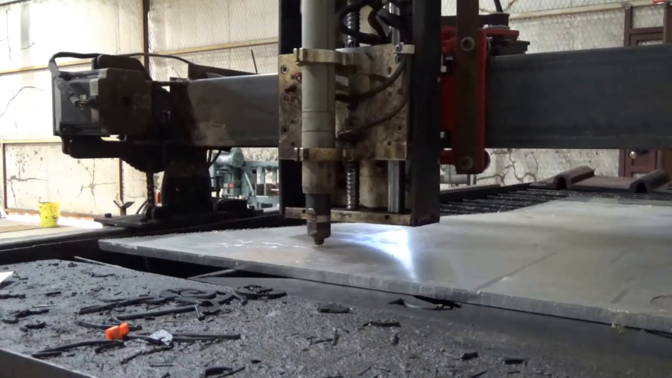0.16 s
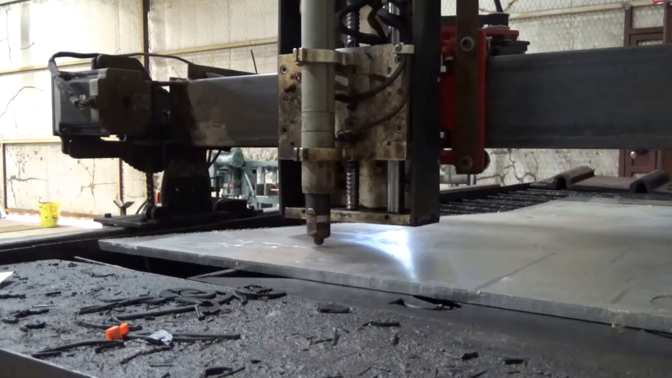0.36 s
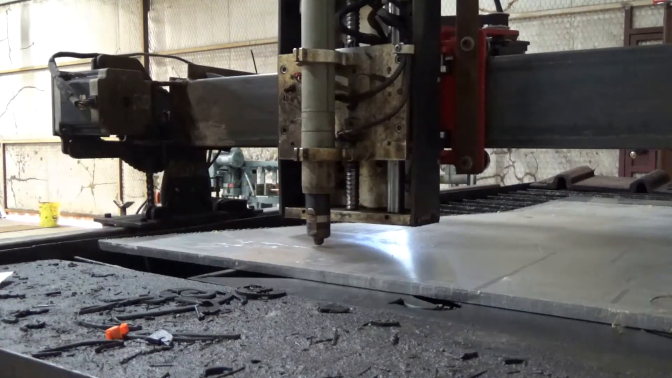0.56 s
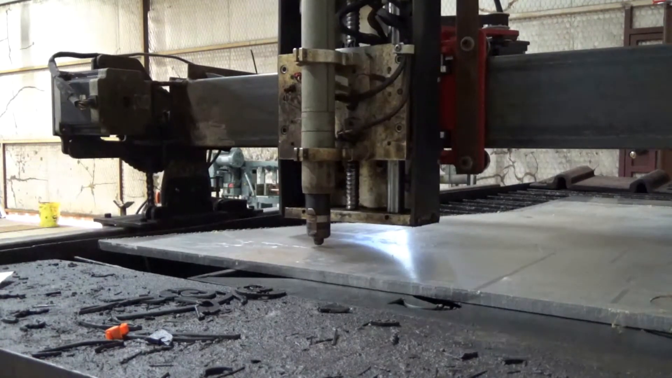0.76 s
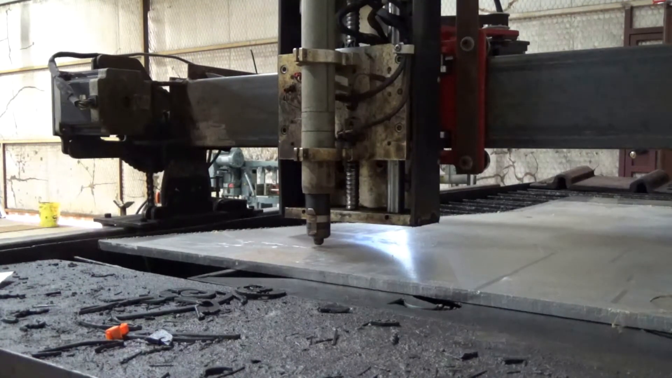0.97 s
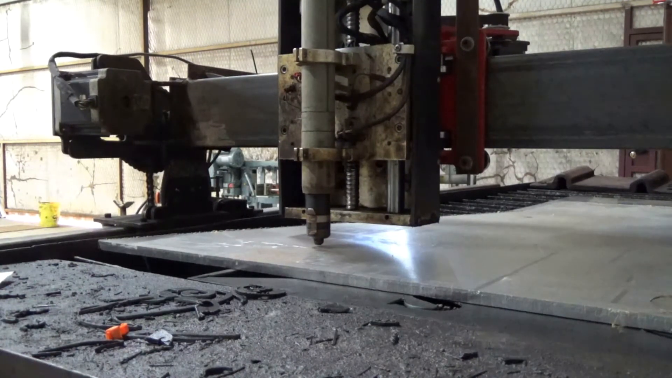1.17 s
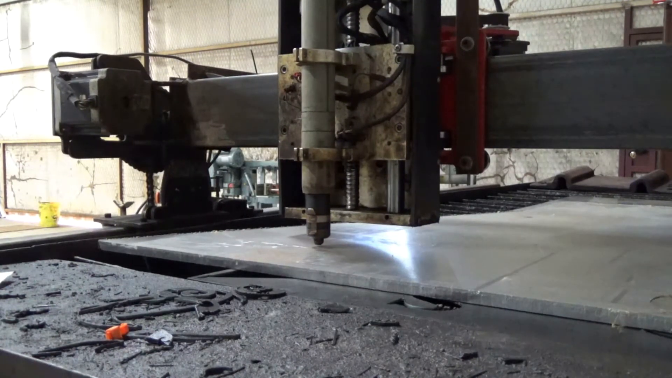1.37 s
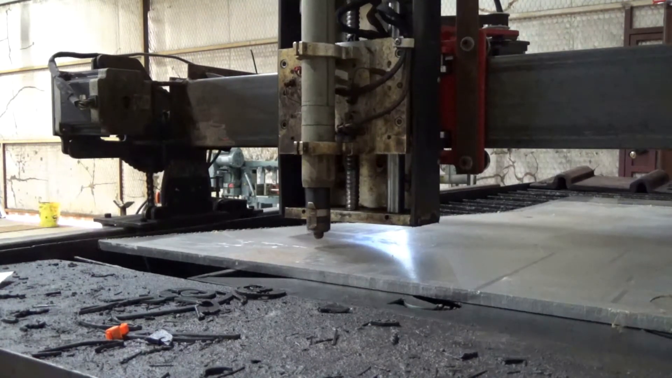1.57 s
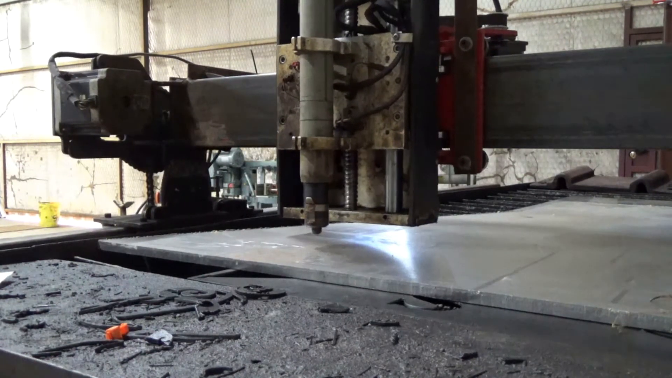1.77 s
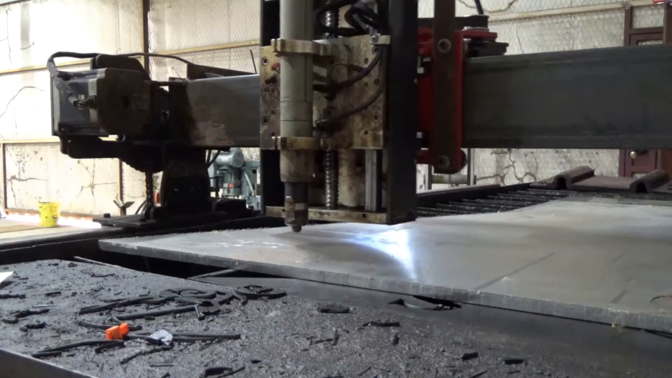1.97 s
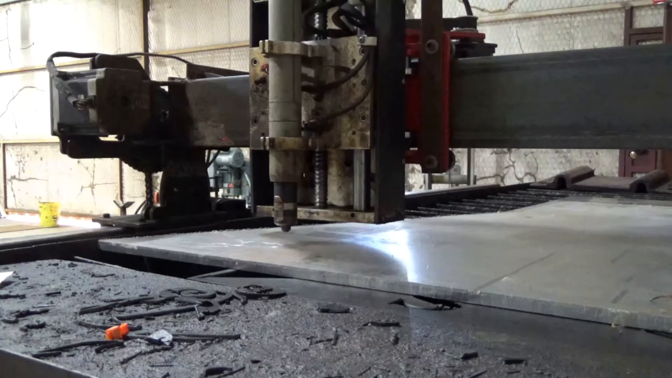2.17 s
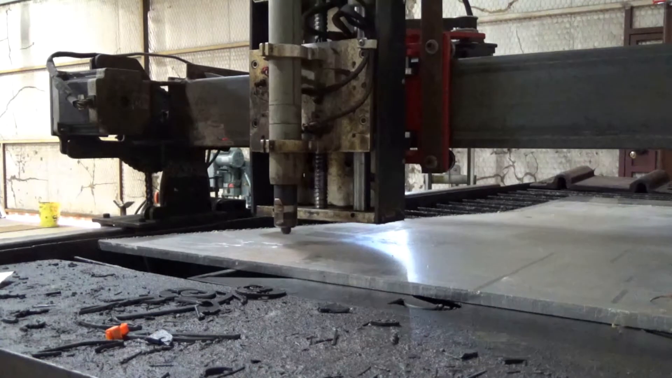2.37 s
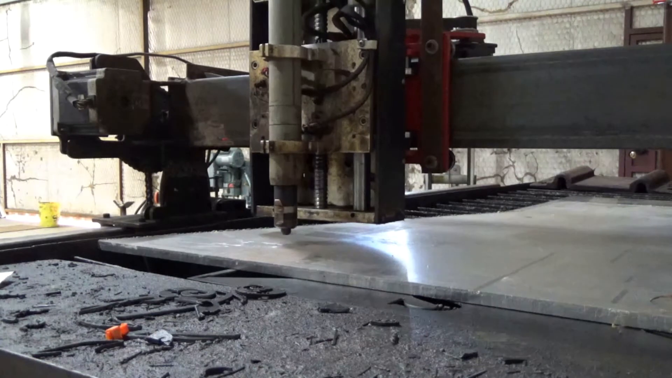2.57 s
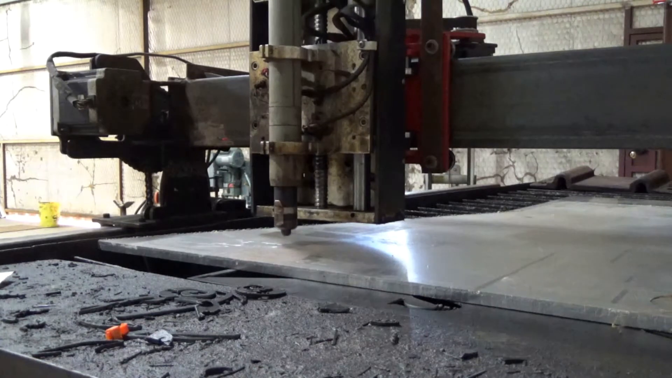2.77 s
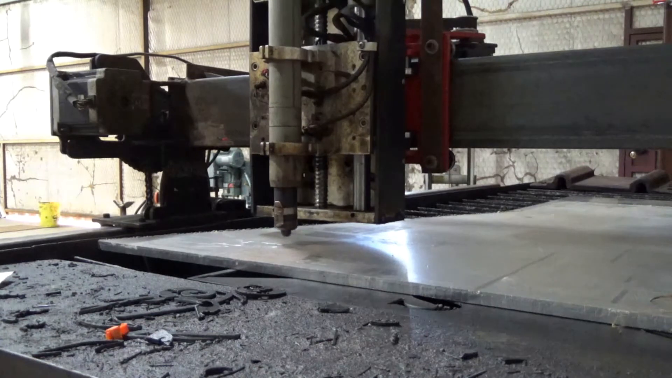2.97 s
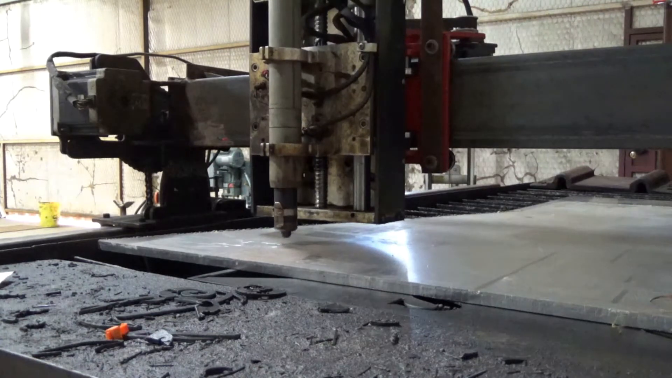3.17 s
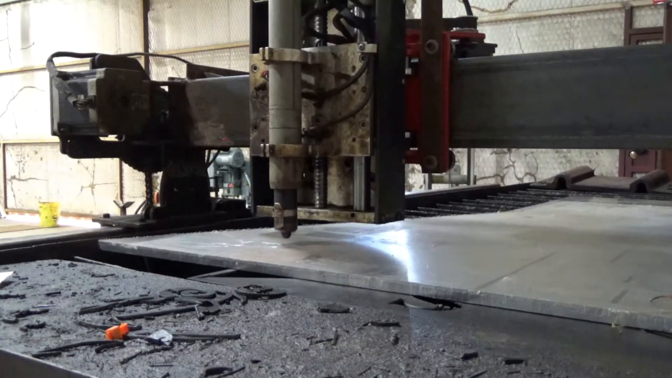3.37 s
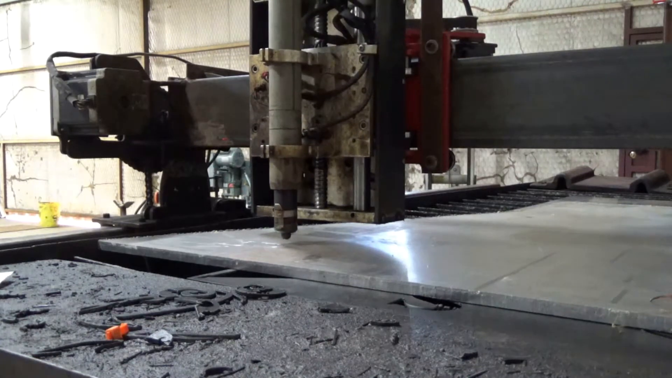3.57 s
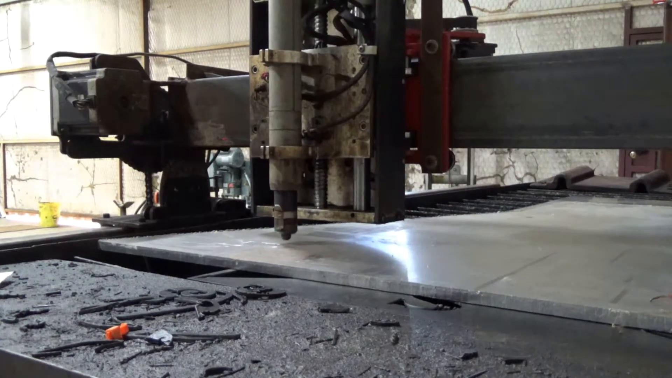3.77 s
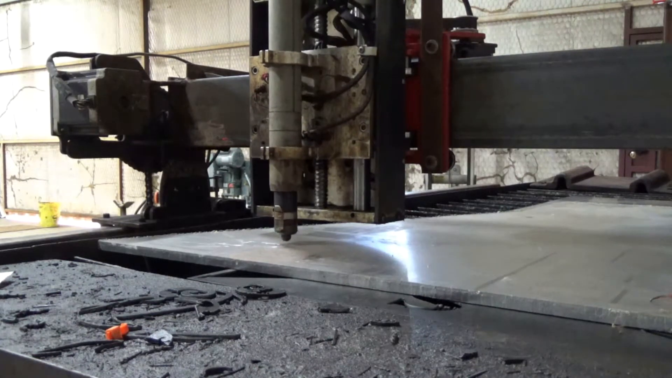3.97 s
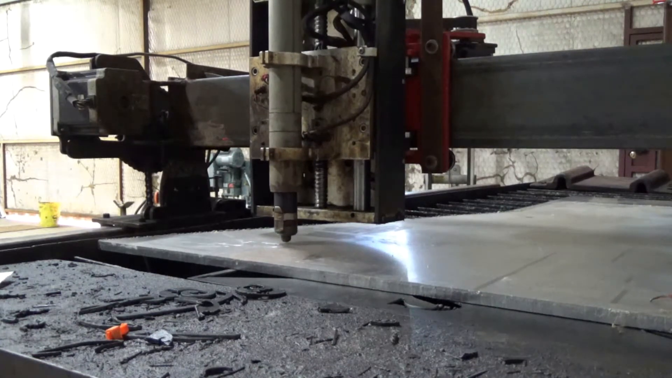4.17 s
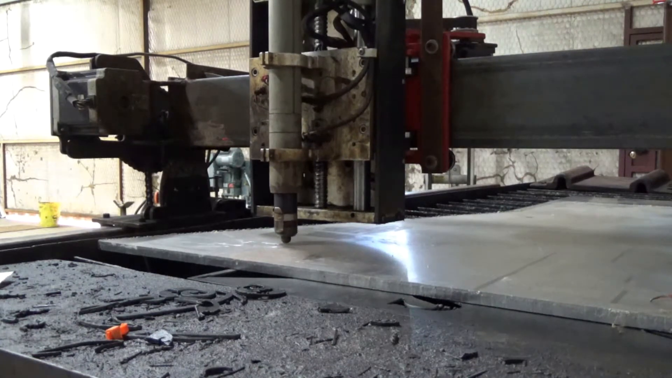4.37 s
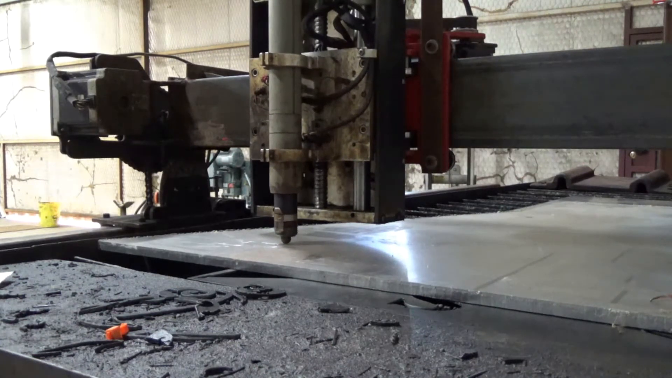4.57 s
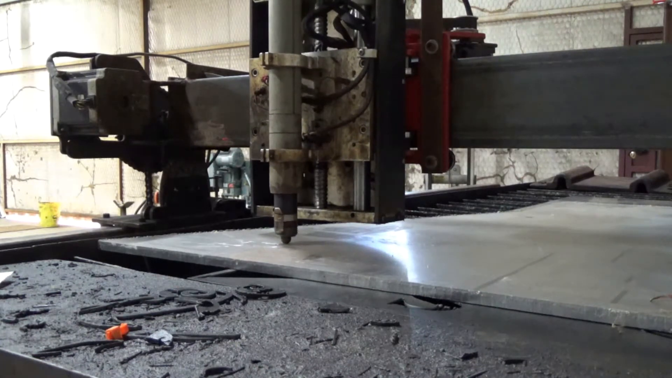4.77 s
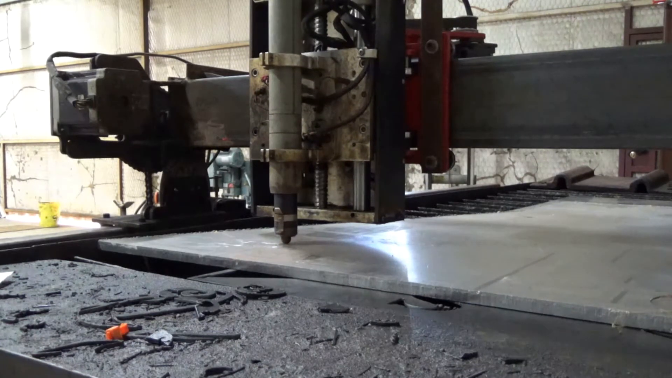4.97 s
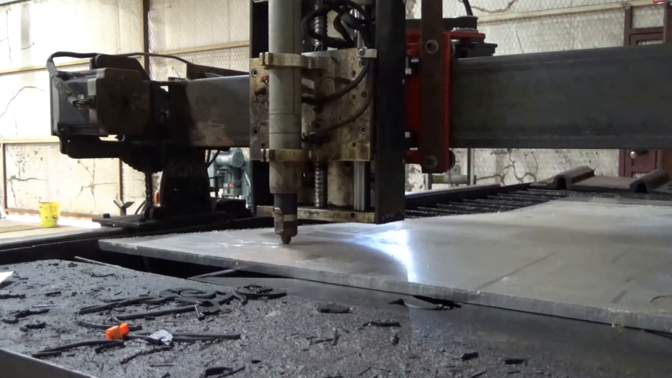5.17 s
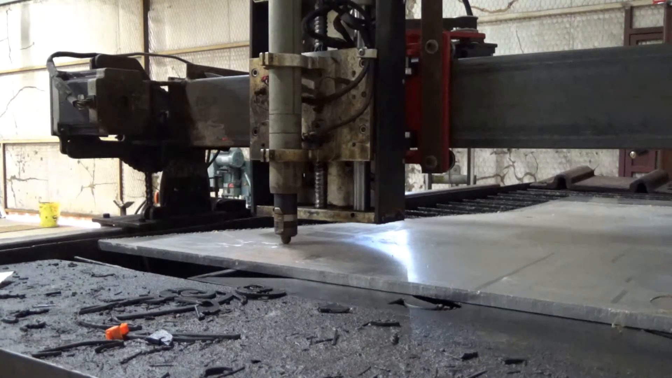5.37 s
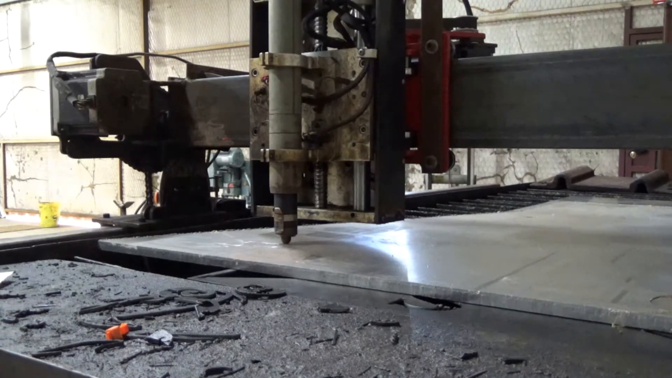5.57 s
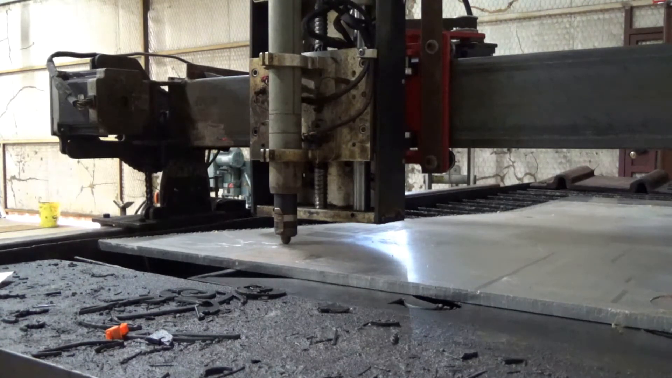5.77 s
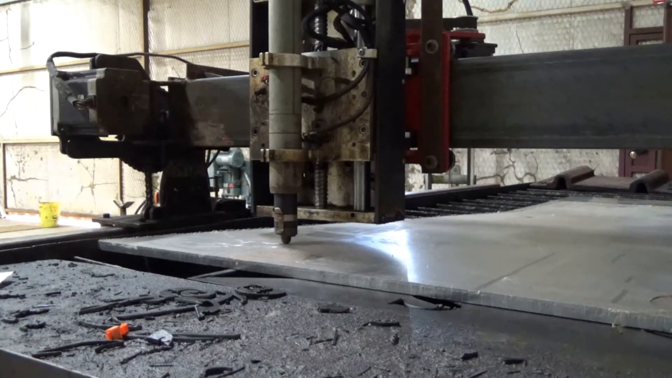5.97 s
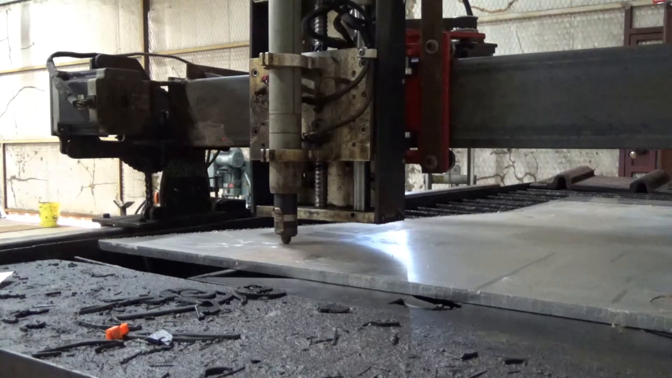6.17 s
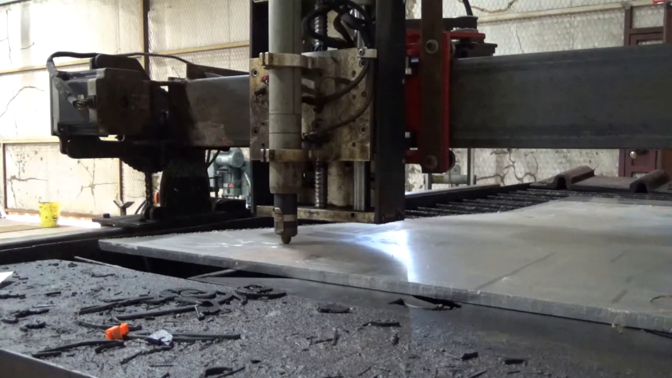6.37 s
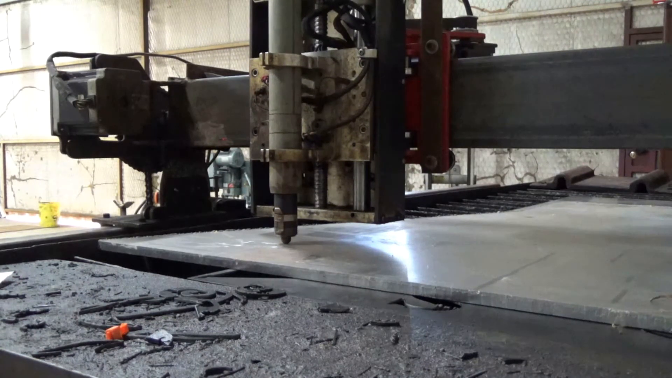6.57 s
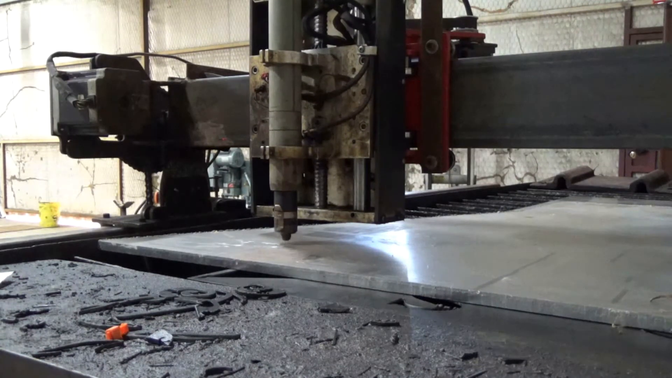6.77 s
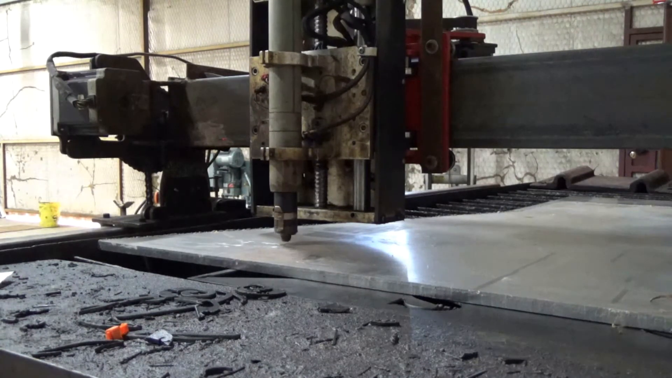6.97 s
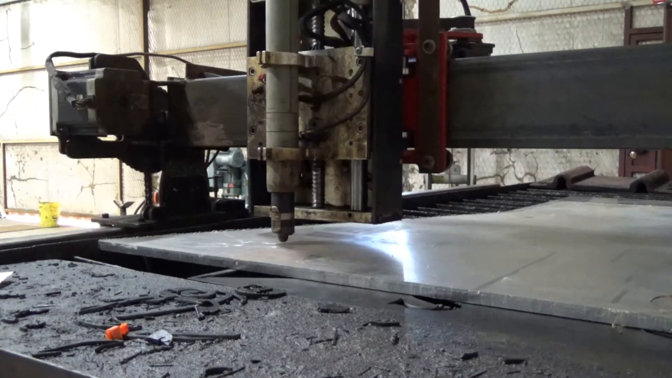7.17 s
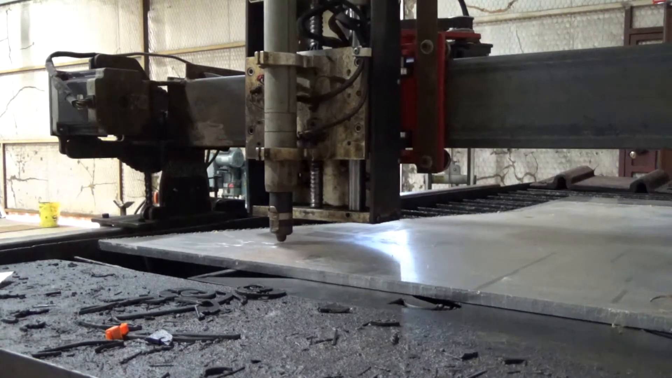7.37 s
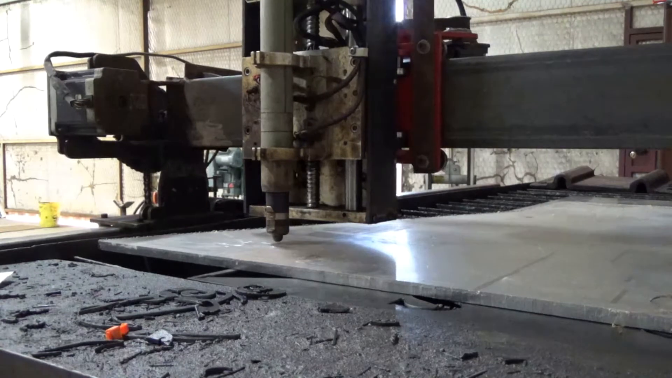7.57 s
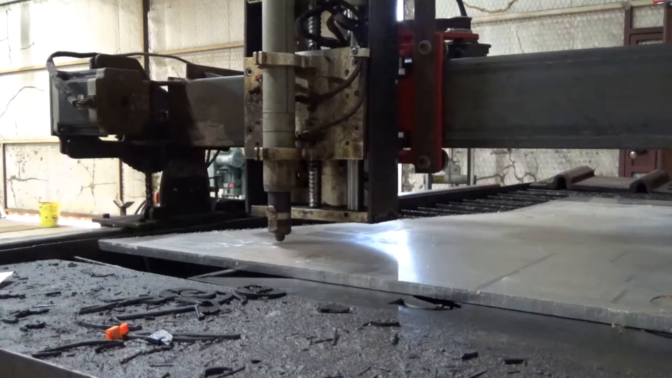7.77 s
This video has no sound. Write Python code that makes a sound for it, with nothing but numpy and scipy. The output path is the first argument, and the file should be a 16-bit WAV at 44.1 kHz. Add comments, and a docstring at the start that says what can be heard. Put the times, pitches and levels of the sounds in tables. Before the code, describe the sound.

Stepper motors whine in quick ramps amid metal knocks and clatter, buzz steadily for several seconds, then growl and rattle once more.

```python
"""A brief whine, then a growl and a clatter: a plasma cutting table moves about in a humming workshop.
Its stepper motors turn in tiny jerks, so their pitch follows their speed. The carriage and gantry (the
bridge it rides on) growl along toothed racks, shake the steel frame and rattle loose fittings. The torch
slide knocks; its lift whines in quick ramps and creeps down for four seconds on a steady buzzing chord.
At the end the lift whines again and the growling and rattling return."""
import sys
import numpy as np
from scipy import signal
from scipy.fft import rfft, irfft, next_fast_len
from scipy.io import wavfile
from scipy.ndimage import uniform_filter1d, map_coordinates

SR = 44100
rng = np.random.default_rng(int(sys.argv[2]) if len(sys.argv) > 2 else 0)


def to_wav(s):
    """Save 16-bit WAV."""
    ch = np.atleast_2d(s).T  # columns
    pcm = np.round(np.clip(ch, -1, 1) * 32767)  # PCM
    wavfile.write(sys.argv[1], SR, pcm.astype(np.int16))


N = 344862

# A motor's speed is given as the frequency of the current in its coils.
TOP_SPEED_HZ, BRAKE_HZ_PER_S = 430.4, 4000
FULL_VOICE_HZ = 122  # below this speed the carriage drive fades away
# Loose fittings strike: (time [s], ring level [dB], clack compared with ring [dB])
CLATTERS = [(0.07, -27.5, 9), (0.214, -7.5, -2.5), (0.231, -21, -1), (1.6177, -24, 7), (1.7269, -21.5, 8),
            (1.99, -17, -2), (2.164, -24, 7), (2.2362, -27, -3), (4.172, -49, 19), (7.0349, -12.5, 1.5),
            (7.0424, -18.5, -4), (7.17, -23.5, 6), (7.1924, -21.5, 3), (7.2448, -15.5, -4),
            (7.2534, -14, 2.5), (7.2723, -15.5, 5.5), (7.427, -26, 9), (7.476, -24, 5), (7.5871, -19, -2),
            (7.67, -12.5, 3), (7.7157, -21, -3), (7.7343, -19.5, 6.5), (7.8114, -23.5, 8.5)]


def amp(db):
    """Turn decibels into a multiplier."""
    return 10 ** (np.asarray(db) / 20)


def unit(x):
    """Scale a signal to an average (rms) strength of 1."""
    return x / np.sqrt(np.mean(x ** 2) + 1e-20)


def along(points, hz):
    """Read between (frequency, value) points on a logarithmic frequency scale."""
    freqs, values = np.transpose(points)
    return np.interp(np.log(hz + 1), np.log(freqs + 1), values)


def curve(points):
    """Join (time, value) points with straight lines."""
    return np.interp(np.arange(N) / SR, *np.transpose(points))


def wobble(rate):
    """A smooth random curve through `rate` new values a second."""
    knots = rng.standard_normal(int(N * rate / SR) + 4)
    coarse = np.arange(0, N + 16, 16)
    return np.interp(np.arange(N), coarse, map_coordinates(knots, [coarse * rate / SR]))


def filtered(x, response):
    """Scale each frequency in x by response(frequency)."""
    size = next_fast_len(N + SR // 2)
    return irfft(rfft(x, size) * response(np.fft.rfftfreq(size, 1 / SR)), size)[..., :N]


def resonances(modes):
    """The response of an object that rings at each (frequency, width, level)."""
    return lambda f: sum((-1) ** k * amp(db) * 1j * f * width / (hz * hz - f * f + 1j * f * width)
                         for k, (hz, width, db) in enumerate(modes))


def noise(response):
    """Filtered stereo noise of strength 1, mostly alike in both ears."""
    # Stereo spread: (frequency [Hz], side compared with middle [dB])
    spread = [(60, -14), (250, -12), (1200, -14.5), (2500, -13), (5000, -9.5)]
    mid, side = filtered(rng.standard_normal((2, N)),
                         lambda f: response(f) * np.array([np.ones_like(f), amp(along(spread, f))]))
    return unit(np.array([mid + side, mid - side]))


def rush(spectrum):
    """Noise shaped by (frequency, level) points."""
    return noise(lambda f: amp(along(spectrum, f)))


def band(hz, width_hz):
    """Noise gathered around one pitch."""
    return noise(lambda f: resonances([(hz, width_hz, 0)])(f) ** 2)


def bursts(times, levels_db, t60):
    """Loudness of hits that start at once and fall 60 dB in t60 seconds."""
    out, t = np.zeros(N + SR), np.arange(SR) / SR
    for start, db in zip(times, levels_db):
        out[round(start * SR):][:len(t)] += amp(db - 60 * t / t60)
    return out[:N]


def swells(rows):
    """Loudness of soft swells, each a (time, half length, level)."""
    t = np.arange(N) / SR
    return sum(amp(db) * np.exp(-np.minimum(50, ((t - peak) / half) ** 2)) for peak, half, db in rows)


def spell(start, stop, fall_db_per_s, attack_s=0.052):
    """Loudness that rises, holds until `stop`, then dies away."""
    t = np.arange(N) / SR
    drop_db = np.minimum(200, fall_db_per_s * np.maximum(0, t - stop))
    return np.clip((t - start) / attack_s, 0, 1) * amp(-drop_db)


def ramp(start, stop, accel, brake, top):
    """Motor speed over one move: speed up, go no faster than `top`, brake to rest."""
    t = np.arange(N) / SR
    return np.clip(np.minimum(accel * (t - start), brake * (stop - t)), 0, top)


def tone(cycles, multiple):
    """A pure tone at a multiple of the coil frequency, slightly different in each ear."""
    angle = (2 * np.pi * ((multiple * cycles + rng.random()) % 1)).astype(np.float32)
    side = 0.16 * np.sin(angle + np.float32(rng.uniform(0, 2 * np.pi)))
    return np.sqrt(2) * np.array([np.sin(angle) + side, np.sin(angle) - side])


def workshop(room_db=-46):
    """Room noise, the hum of the powered drives and a little low flutter."""
    # Idling machine and room: (frequency [Hz], level [dB])
    room_spectrum = [(12, -55), (20, -28), (85, -18), (114, -16.5), (303, -13), (385, -17.5), (706, -17.5),
                     (850, -15), (944, -17), (1440, -20), (11000, -33), (14300, -68.5), (22000, -120)]
    # Hum and hiss of the drives: (frequency [Hz], width [Hz], level [dB])
    hum_bands = [(125.4, 8.8, -53.5), (307.9, 9.4, -51.5), (322, 150, -57.5), (707, 76, -56.5),
                 (9320, 990, -56.5)]
    # Soft low flutters: (time [s], half length [s], level [dB])
    flutters = [(3.04, 0.055, -46), (3.26, 0.055, -45), (3.58, 0.15, -52)]
    hum = sum(amp(db) * band(hz, width) for hz, width, db in hum_bands)
    flutter = swells(flutters) * rush([(10, -10), (35, 1), (60, -7), (120, -17), (400, -72)])
    return amp(room_db + 0.18 * wobble(4.5)) * rush(room_spectrum) + hum + flutter


def carriage_whine(stop_s=0.052, fade_s=0.04, flutter_db=2, jitter=0.0017):
    """The carriage motor whines cleanly at full speed until it is cut off."""
    # Tones of the whine: (multiple of the coil frequency, level [dB])
    tones = [(3, -45), (4, -31), (5, -40), (6, -47.5), (7, -47), (8, -56), (9, -64), (10, -52)]
    cycles = np.cumsum(TOP_SPEED_HZ * (1 + jitter * wobble(100))) / SR
    fade = np.clip(1 - (np.arange(N) / SR - stop_s) / fade_s, 0, 1)
    flutter = amp(flutter_db * wobble(110))
    return fade * flutter * sum(amp(db) * tone(cycles, k) for k, db in tones)


def shaking(rumble_db=-3, growl_db=-1, rasp_db=-1.5, lumps_db=2, grain_db=3, jolt_db=-14):
    """Gear teeth meet unevenly and shake frame, gearbox and rack; the gantry rings on after slowing."""
    # Spells of shaking: (start [s], stop [s], frame rumble [dB], gear growl [dB], rack rasp [dB])
    shakes = [(-.1, 0.117, -39, -40, -35), (0.122, 0.25, -22, -26.5, -32), (1.77, 2.19, -31, -31, -35),
              (6.996, 7.412, -31, -29.5, -34.5), (7.424, 7.599, -24, -25.5, -31.5),
              (7.643, 7.82, -23, -26.5, -33.5)]
    # Shaking from the lift at full speed: (frame rumble [dB], gear growl [dB], rack rasp [dB])
    lift_shake = (-37, -32.5, -32)
    # Ringing of the steel frame: (frequency [Hz], width [Hz], level [dB])
    frame_modes = [(140, 32, 0), (173.4, 27, -0.5), (272.6, 37, 2), (344, 19, 2.5), (422, 31, 1),
                   (507, 20, -12)]
    # Teeth rasping on the rack: (frequency [Hz], level [dB])
    rasp_spectrum = [(900, -10), (1400, 8), (1750, 1.5), (2020, 5.5), (2280, -1), (2500, -7), (3000, -1),
                     (3500, -5.5), (4200, -12.5), (5100, -11.5), (5900, -13), (8700, -19.5), (9400, -13),
                     (10000, -13), (11000, -19)]
    lifting = (lift_speed()[0] / TOP_SPEED_HZ) ** 0.19
    strengths = []
    for part, fall_db_per_s in enumerate([67, 81, 154]):  # rumble, growl, rasp
        power = sum((amp(levels[part]) * spell(start, stop, fall_db_per_s)) ** 2
                    for start, stop, *levels in shakes)
        strengths.append(np.sqrt(power + (amp(lift_shake[part]) * lifting) ** 2))
    rumble, growl, rasp = strengths
    times, clatter_db, _ = np.transpose(CLATTERS)
    growl = np.hypot(growl, bursts(times, clatter_db + jolt_db, t60=0.28))  # clatters jolt the gearbox
    teeth = wobble(260)
    lumps, grain = unit(amp(lumps_db * teeth)), unit(amp(grain_db * teeth))
    frame = amp(rumble_db) * rumble * noise(resonances(frame_modes))
    gearbox = amp(growl_db) * growl * lumps * noise(gearbox_ringing())
    rack = amp(rasp_db) * rasp * grain * rush(rasp_spectrum)
    gantry = bursts(times=[0.29], levels_db=[-32], t60=1.0) * band(310, width_hz=70)
    return frame + gearbox + rack + gantry


def gearbox_ringing():
    """The gearbox's response: it rings at its own pitches whatever shakes it."""
    # Those pitches: (frequency [Hz], width [Hz], level [dB])
    gearbox_modes = [(551, 49, -1), (670, 17.6, 7.5), (793, 30, 3), (861, 62, -1.5), (976, 18.5, 2.5),
                     (1170, 36, -2), (1310, 24, -2.5), (1360, 12, -4.5), (1590, 48, -20)]
    return resonances(gearbox_modes)


def rattles(ring_db=-10, clack_db=-9):
    """Each hit rings the small steel fittings and their bracket; the fittings chatter on briefly."""
    # Bright ringing of the fittings: (frequency [Hz], width [Hz], level [dB])
    fitting_modes = [(5723, 160, 2.5), (6160, 69, 3), (6710, 58, -2), (6330, 75, -13), (7080, 16, 6),
                     (7580, 86, -5), (8160, 250, -10), (9230, 110, -10.5)]
    # Lower clack of the bracket: (frequency [Hz], width [Hz], level [dB])
    bracket_modes = [(700, 200, -27), (1156, 120, 21), (2010, 180, 22.5), (2400, 200, -13),
                     (2900, 76, 15.5)]
    times, hit_db, extra_db = np.transpose(CLATTERS)
    chatter = bursts(times, hit_db - 25, t60=0.35) * amp(4 * wobble(200))
    ring = (bursts(times, hit_db + ring_db, t60=0.046) + chatter) * noise(resonances(fitting_modes))
    clack = bursts(times, hit_db + extra_db + clack_db, t60=0.065) * noise(resonances(bracket_modes))
    return ring + clack


def travel_speed(slowing_db=-24.5, crossing_db=-26.5, contour_db=-28.5):
    """Speed and loudness of the carriage and gantry drive over three moves; slower is quieter."""
    # The gantry slows to a halt: (time [s], coil frequency [Hz])
    slowing_points = [(.1, 135), (.128, 124), (.152, 106), (.24, 82), (.36, 20)]
    # The carriage speeds up and slows again evenly: (start [s], stop [s], acceleration [Hz/s])
    crossing_move = (1.669, 2.276, 950)
    # The gantry follows an outline: (time [s], coil frequency [Hz])
    contour_points = [(6.97, 20.6), (7.04, 138), (7.1, 200), (7.16, 158), (7.25, 141), (7.35, 158),
                      (7.45, 160), (7.5, 198), (7.65, 140)]
    t = np.arange(N) / SR
    slowing = curve(slowing_points) * (t > slowing_points[0][0]) * (t < slowing_points[-1][0])
    start, stop, accel = crossing_move
    crossing = ramp(start, stop, accel, accel, TOP_SPEED_HZ)
    contour = curve(contour_points) * (t > contour_points[0][0])
    moves = [(slowing, slowing_db), (crossing, crossing_db), (contour, contour_db)]
    gain = sum(amp(db) * np.minimum(1, hz / FULL_VOICE_HZ) ** 3.3 for hz, db in moves)
    return slowing + crossing + contour, uniform_filter1d(gain, size=1200)


def travel_growl(motor_db=-10, rough_db=4.5, surge_db=2, groan_db=-9, squeal_db=-53):
    """The drive's tones sweep through the carriage's resonances; its gearbox groans, its coils squeal."""
    # Tones of the drive: (multiple of the coil frequency, level [dB])
    tones = [(1, -6), (2, 0), (3, -3), (4, 1), (5, -8), (6, -4), (7, -8), (8, -4), (10, -6), (12, -8),
             (16, 5.5)]
    # How well the carriage gives off each pitch: (frequency [Hz], level [dB])
    body = [(70, -22), (150, -1), (280, -2), (420, 2), (540, 0), (680, 3), (850, 1), (1050, -8), (1400, -2),
            (1750, -1), (2050, 1), (2500, -9), (3100, -8), (4500, -15)]
    hz, drive = travel_speed()
    loose = np.clip(1.6 - hz / 300, 0.2, 1)  # slack gears chatter at low speed
    cycles = np.cumsum(hz) / SR + 0.0055 * loose * wobble(170)
    inertia = (127 / np.maximum(hz, 127)) ** 10  # the highest tone only survives at low speed
    chord = 0
    for k, db in tones:
        flicker_db = rough_db * loose * wobble(70) + surge_db * wobble(22)
        gain = amp(db + along(body, k * hz) + flicker_db)
        chord = chord + gain * (inertia if k > 12 else 1) * tone(cycles, k)
    motor = amp(motor_db) * drive * chord
    squeal_gain = amp(squeal_db + 4 * wobble(25)) * np.minimum(1, hz / FULL_VOICE_HZ)
    squeal = squeal_gain * band(9520, width_hz=260)
    groan = amp(groan_db) * filtered(motor, gearbox_ringing())
    return motor - groan + squeal


def knocks(clack_db=1):
    """As its slack is taken up, the heavy slide thuds and its steel faces clack."""
    # Knocks of the slide: (time [s], thud [dB], clack [dB])
    hits = [(0.396, -28, -36.5), (.578, -29, -45), (0.8, -28, -55), (0.813, -35, -37.5),
            (1.0737, -14.5, -32.5), (1.089, -40, -36), (1.094, -40, -29.5), (1.11, -22.5, -39),
            (1.411, -24.5, -36), (2.358, -37, -36), (6.419, -49, -49), (6.473, -44, -33.5)]
    # Low ringing of the slide: (frequency [Hz], width [Hz], level [dB])
    thud_modes = [(190, 45, 5.5), (343, 90, 4.5), (497, 134, -2)]
    # Steel meeting steel: (frequency [Hz], level [dB])
    clack_spectrum = [(200, 3), (600, 5), (1200, 4), (1800, 2.5), (2500, 4), (4000, 0.5), (6000, -11),
                      (9500, -4.5), (11000, -6)]
    times, thud_levels, clack_levels = np.transpose(hits)
    pushes = np.bincount(np.round(times * SR).astype(int), amp(thud_levels), N)
    thud = filtered(pushes, resonances(thud_modes))
    thud = thud / np.abs(thud).max() * amp(thud_levels.max())
    return thud + bursts(times, clack_levels + clack_db, t60=0.08) * rush(clack_spectrum)


def lift_speed():
    """Speed and loudness of the torch lift over its fast moves."""
    # Fast moves: (start [s], stop [s], acceleration [Hz/s], level [dB])
    moves = [(1.424, 1.783, 7525, 2), (2.174, 2.334, 4092, 5), (6.418, 6.458, 4100, -17),
             (6.472, 6.87, 4105, 1), (6.893, 7.043, 4120, 3)]
    speed, gain = 0, 0
    for start, stop, accel, db in moves:
        hz = ramp(start, stop, accel, BRAKE_HZ_PER_S, TOP_SPEED_HZ)
        speed = speed + hz
        gain = gain + amp(db) * np.minimum(1, hz / 20)
    return speed, gain


def lift_whine(whine_db=-1, overtone_db=-24, flutter_db=2.5, sway_db=1.5, jitter=0.0018, chirp_db=-43):
    """Four motor steps per coil cycle make the whine; rough overtones come out at top speed."""
    # Tones of the lift motor: (multiple of the coil frequency, level [dB])
    tones = [(2, -32.8), (3, -23.9), (4, 0.0), (5, -21.0), (7, -29.0), (8, -19.0), (9, -25.7), (12, -23.9),
             (13, -21.9), (14, -25.3), (15, -27.4), (16, -25.1), (17, -30.2), (19, -34.9), (22, -30.7),
             (25, -38.0)]
    # The whine peaks where the steps meet the slide's resonance: (coil frequency [Hz], level [dB])
    whine_by_speed = [(20, -69), (100, -52), (170, -39), (215, -27.5), (315, -21.5), (430, -24.5)]
    # Ringing of the torch slide: (frequency [Hz], width [Hz], level [dB])
    slide_modes = [(819, 11, 7), (975, 25, -2), (1220, 30, -4)]
    hz, gain = lift_speed()
    cycles = np.cumsum(hz * (1 + jitter * wobble(120))) / SR
    ramping = np.minimum(1, np.abs(np.gradient(hz)) * SR / 2000)
    cycles += (0.002 + 0.022 * ramping) * wobble(260)  # the rotor swings while the speed changes
    overtones = amp(overtone_db) * (hz / TOP_SPEED_HZ) ** 3.5
    whine = amp(whine_db + along(whine_by_speed, hz) + flutter_db * wobble(110) + sway_db * wobble(14))
    chord = 0
    for k, db in tones:
        strength = whine if k == 4 else overtones * amp(db + 2.5 * wobble(130))
        chord = chord + strength * tone(cycles, k)
    # at low speed the motor's tiny in-between steps are heard as a rough chirp
    slow = np.exp(-((hz - 95) / 28) ** 2)
    chirp = amp(chirp_db) * slow * tone(cycles + 0.008 * wobble(700), multiple=32)
    motor = gain * (chord + chirp)
    return motor + filtered(motor, resonances(slide_modes))


def lift_creep(coil_hz=184.385, screw_db=-48.5, swell_period_s=1.48, faded_at_s=3.53):
    """Slow steps lower the torch: a chord over a buzz, with the hiss of the screw that moves it."""
    # The slow descent: (start [s], stop [s])
    descent = (2.328, 6.412)
    # Tones of the chord: (multiple of the coil frequency, level [dB])
    steady_tones = [(2.0, -58), (3.0, -45), (5.0, -58), (6.0, -50), (7.0, -46), (8.0, -48), (8.5, -58),
                    (11.0, -54), (12.0, -58), (16.0, -50), (18.0, -51), (19.0, -51), (20.0, -58),
                    (23.0, -63), (28.25, -63), (29.25, -65), (29.75, -62), (30.25, -63), (31.25, -64),
                    (48.5, -64), (49.5, -65), (50.5, -59), (53.5, -66), (54.0, -63), (57.5, -66)]
    # Rise and fall of the tone at ten times the coil frequency: (time [s], level [dB])
    tenth_levels = [(2.4, -44), (2.56, -55.5), (3.44, -46.5), (3.6, -58), (3.7, -46), (3.97, -46),
                    (4.18, -65), (5.01, -46.5), (5.18, -57), (5.29, -43), (5.61, -53), (6.28, -57),
                    (6.35, -45.5)]
    # Rubbing of the screw: (frequency [Hz], level [dB])
    screw_spectrum = [(100, 3.5), (280, 14.5), (450, 5.5), (1100, -3.5), (1900, 5.5), (2400, -27),
                      (3100, -3), (4200, -21), (5500, -42), (6500, -11), (10500, -11)]
    speed = ramp(*descent, BRAKE_HZ_PER_S, BRAKE_HZ_PER_S, coil_hz)
    cycles = np.cumsum(speed * (1 + 0.0002 * wobble(25))) / SR
    # the ninth multiple swells and fades evenly as the slide travels
    swell = np.abs(np.sin(np.pi * (np.arange(N) / SR - faded_at_s) / swell_period_s))
    ninth_db = -41.5 - 13.5 * (1 - swell) ** 2
    tones = [(k, db + wobble(4)) for k, db in steady_tones]
    tones += [(9, ninth_db), (10, curve(tenth_levels) + 5)]
    chord = sum(amp(db) * tone(cycles, k) for k, db in tones)
    buzz = creep_buzz(cycles, coil_hz, skip=[k for k, _ in tones])
    return (speed / coil_hz) ** 0.95 * (chord + buzz + amp(screw_db) * rush(screw_spectrum))


def creep_buzz(cycles, coil_hz, skip, loop_size=8192):
    """Many weak motor tones blend into a buzz that repeats every four coil cycles."""
    # Weak tones: (frequency [Hz], whole multiples [dB], half multiples [dB], quarter multiples [dB])
    buzz_levels = [(500, -62, -67, -73), (2500, -62, -73, -74), (3450, -60, -62, -66),
                   (4000, -68, -73, -74), (5400, -74, -74, -72), (6500, -81, -77, -78),
                   (8200, -78, -79, -79), (9000, -72, -67, -78), (10800, -79, -70, -86)]
    multiples = np.arange(241) / 4
    weak = (multiples > 1) & ~np.isin(multiples, skip)
    hz, *families = np.transpose(buzz_levels)
    whole, half, quarter = [np.interp(multiples * coil_hz, hz, db) for db in families]
    level_db = np.select([multiples % 1 == 0, multiples % 1 == 0.5], [whole, half], quarter)
    level_db += 2 * rng.standard_normal(len(multiples))
    spectrum = weak * amp(level_db) * np.exp(2j * np.pi * rng.random((2, len(multiples))))
    loops = irfft(spectrum, loop_size) * loop_size / np.sqrt(2)
    position = cycles / 4 % 1 * loop_size
    mid, side = [np.interp(position, np.arange(loop_size), loop) for loop in loops]
    return np.array([mid + 0.33 * side, mid - 0.33 * side])


def scrapes():
    """The sinking slide rubs briefly over rough spots."""
    # Rough spots on the screw: (time [s], half length [s], level [dB])
    rough_spots = [(3.0, 0.035, -44), (3.24, 0.059, -43), (3.48, 0.052, -43)]
    return swells(rough_spots) * rush([(800, 2), (2500, -4.5), (4000, -4.5), (6000, -15), (9000, -18)])


def room_echo(x):
    """The workshop answers with a short tail of sound, different in each ear."""
    # How long the room rings: (frequency [Hz], time to fall 60 dB [s])
    decay_times = [(200, 0.35), (2000, 0.45), (10000, 0.12)]
    hz, t, spectra = signal.stft(rng.standard_normal((2, SR // 2)), SR, nperseg=256)
    decay = amp(-60 * t / along(decay_times, hz)[:, None])
    _, tail = signal.istft(spectra * decay, SR, nperseg=256)
    delayed = np.pad(x.mean(axis=0), (300, 0))[None]
    return signal.fftconvolve(delayed, tail / np.linalg.norm(tail[0]), axes=1)[:, :N]


def scene(echo_db=-14):
    """Quick moves and hits echo in the room; shaking, creeping and background are added without echo."""
    moves = lift_whine() + carriage_whine() + travel_growl() + rattles() + knocks()
    return moves + amp(echo_db) * room_echo(moves) + shaking() + lift_creep() + scrapes() + workshop()


def record(dry, top_hz=11080):
    """Cut away the highest treble."""
    return filtered(dry, lambda hz: hz < top_hz)


dry = scene()
out = record(dry)
to_wav(out)
```